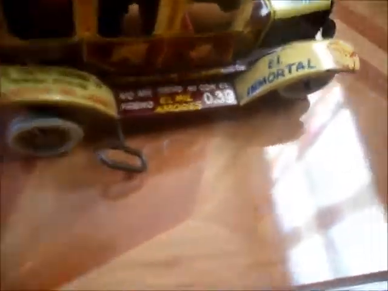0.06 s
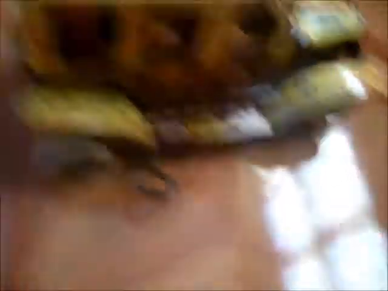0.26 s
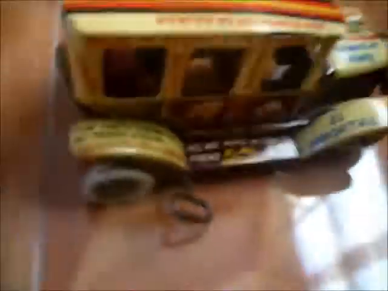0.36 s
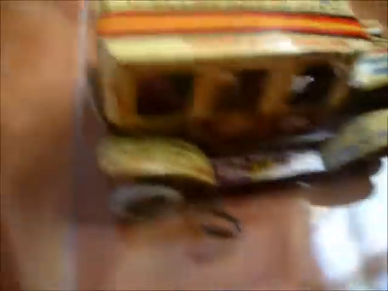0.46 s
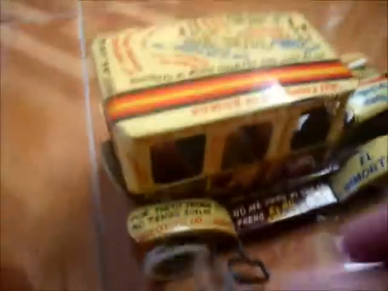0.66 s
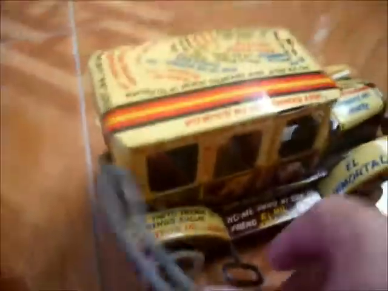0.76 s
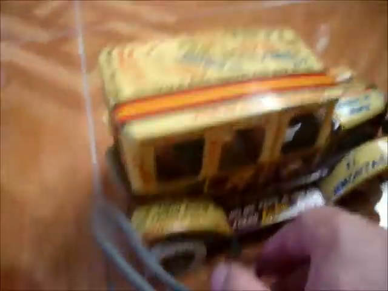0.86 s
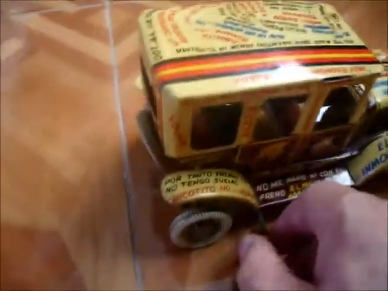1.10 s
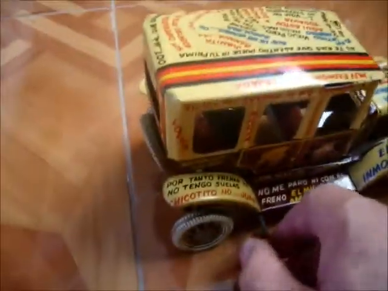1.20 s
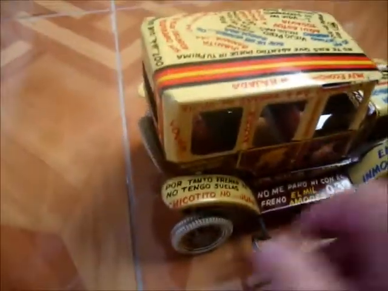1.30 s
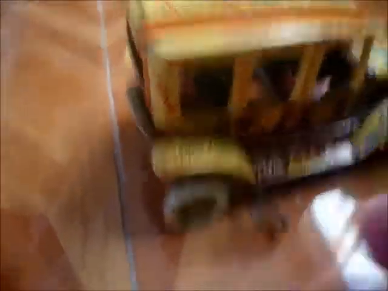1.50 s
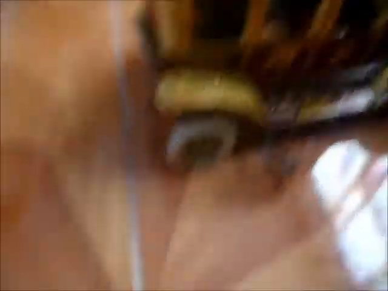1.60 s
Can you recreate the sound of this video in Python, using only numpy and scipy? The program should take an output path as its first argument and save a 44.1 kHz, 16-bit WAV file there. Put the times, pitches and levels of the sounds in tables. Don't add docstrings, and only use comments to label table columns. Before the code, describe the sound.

A tin wind-up toy car, close up in a quiet room. Damped knocks and a loud crack come at 0.2 s, another knock at 0.36, a quick loose chatter at 0.4, and a soft click at 0.6. From 0.85 to 1.25 it scrapes on tile with ringing key tugs, then jolts at 1.26, bouncing and rattling away with a thin spring buzz. Faint, grainy room noise; dull narrow-band microphone.

```python
import sys
import numpy as np
from scipy import signal
from scipy.io import wavfile
from scipy.ndimage import uniform_filter1d

SR = 44100
rng = np.random.default_rng(int(sys.argv[2]) if len(sys.argv) > 2 else 0)


def undo_db(level):
    steps = np.asarray(level, float) / 20
    return 10 ** steps


def unload_audio(sound):
    columns = np.transpose(np.atleast_2d(sound))
    steps = np.round(np.clip(columns, -1, 1) * 32767)
    wavfile.write(sys.argv[1], SR, steps.astype(np.int16))


N = 72765
RISE_S = 0.0003
PATCHY_DB = 1.5

# pitch_hz, level_db, t60_s
EDGE = [(2484, 1.5, 0.0061), (2510, -8.5, 0.0067), (3480, -15, 0.019), (1430, -14.5, 0.015)]


def unit(x):
    return x / np.sqrt(np.mean(x ** 2) + 1e-20)


def ring(modes, rise_s):
    t = np.arange(SR // 2) / SR
    decaying = sum(undo_db(db - 60 * t / t60) * np.sin(2 * np.pi * hz * t) for hz, db, t60 in modes)
    return decaying * (1 - np.exp(-t / rise_s))


def strikes(times, sizes):
    places = np.round(np.asarray(times) * SR).astype(int)
    return np.bincount(places, sizes, N)[:N]


def sound(force, body):
    return signal.fftconvolve(force, body)[:N]


def dull(x, hz):
    return signal.lfilter(*signal.butter(2, hz, fs=SR), x)


def grains(rate, spread_db):
    where, size, sign = rng.random((3, N))
    heights = undo_db(-abs(spread_db) * np.log(size + 1e-9))
    return unit((where < rate / SR) * heights * np.sign(sign - .5))


def noise(spectrum, patchy_db):
    hz, _, z = signal.stft(rng.standard_normal(N), SR, nperseg=1024)
    field = uniform_filter1d(rng.standard_normal(z.shape), size=4, axis=0)
    field = uniform_filter1d(field, size=5, axis=1)
    f, db = np.transpose(spectrum)
    colour = np.interp(np.log(hz + 1), np.log(f), db)[:, None]
    coloured = z * undo_db(colour + patchy_db * unit(field))
    return unit(signal.istft(coloured, nperseg=1024)[1][:N])


def shared_blows(blows, bodies):
    s, swing, *parts = np.transpose(blows)
    return sum(sound(strikes(s, np.sign(swing) * undo_db(db)), body) for db, body in zip(parts, bodies))


def hand_knocks():
    # start_s, first_swing (+/-), shell_db, edge_db, base_db
    blows = [
        (.2101, 1, -20, -20, -30),
        (.21065, -1, -5, -24, -11),
        (.3633, -1, -5, -22, -24),
        (.596, 1, -36, -45, -33),
        (.6052, -1, -26, -36, -42),
    ]
    # pitch_hz, level_db, t60_s
    shell = [(1103, 5.5, 0.0041), (1039, -8, 0.02)]
    base = [(663, -8.5, 0.03), (896, 6.5, 0.005)]
    return shared_blows(blows, (ring(shell, 0.00058), ring(EDGE, RISE_S), ring(base, RISE_S)))


def loudest_crack():
    start_s, lag_s, rise_s, size = .21731, .0001, .00012, undo_db(0.86)
    # pitch_hz, level_db, t60_s
    plate = [(2230, 4, .003), (2230, -16.5, .016),
             (2500, -23, .018), (3370, -20, .015)]
    recoil = [(1070, -7, .021)]
    crack = sound(strikes([start_s], [size]), ring(plate, rise_s))
    return crack - sound(strikes([start_s + lag_s], [size]), ring(recoil, rise_s))


def axle_shudder():
    # start_s, first_swing (+/-), panel_db, rim_db, belly_db
    blows = [
        (.378, 1, -45.5, -32, -53),
        (.3879, 1, -34, -14.5, -11),
        (.3918, 1, -20.5, -21, -28),
        (.3941, 1, -26, -24, -23.5),
        (.3983, 1, -13.5, -14, -18),
        (.4012, 1, -19, -25, -18.5),
        (.4022, 1, -21.5, -16.5, -16),
        (.4044, 1, -12.5, -43, -38.5),
    ]
    # pitch_hz, level_db, t60_s
    panel = [(933, 1, 0.014), (1086, -11.5, 0.026)]
    rim = [(2740, -0.5, 0.0099), (1921, -8.5, 0.023), (3150, -5.5, 0.0052)]
    belly = [(548, -5.5, 0.044), (826, -5, 0.018)]
    return shared_blows(blows, (ring(panel, RISE_S), ring(rim, RISE_S), ring(belly, RISE_S)))


def free_tin(force):
    # pitch_hz, level_db, t60_s
    tin = [(449.3, -7, 0.11), (701, -5, .09), (860, -10, .08), (969, 0, .14), (970, -3, 0.045),
           (1286, -1, 0.1), (1453, -3.5, 0.071), (1752, -7, .07), (2033, -17, 0.44), (2421, -6.5, .09),
           (2592, -9.5, 0.072), (2966, -10.5, 0.13), (3202, -11, 0.12)]
    clack = [(932, 0, .014), (733, -6, .015), (1405, -4, 0.0037), (1850, -6.5, 0.019), (2450, -8, 0.006),
             (3160, -10.5, 0.0051)]
    return sound(force, ring(tin, RISE_S) + undo_db(6.5) * ring(clack, RISE_S))


def sliding_and_winding():
    t = np.arange(N) / SR
    # time_s, level_db
    slide = [(.84, -70.5), (.9, -53), (.95, -46), (1.0, -48.5), (1.08, -45), (1.16, -46.5), (1.22, -52),
             (1.3, -51), (1.42, -63)]
    # start_s, level_db
    key = [(.911, -35), (0.934, -24), (0.949, -29), (0.989, -31), (1.037, -25.5), (1.044, -30.5),
           (1.078, -25.5), (1.084, -31.5), (1.123, -28.5), (1.2381, -21.5), (1.245, -31)]
    # pitch_hz, density_db (per Hz)
    drag = [(120, -48), (200, -7.5), (420, -1), (700, -14), (1500, -30.5)]
    pressure = undo_db(np.interp(t, *np.transpose(slide), left=-120, right=-120))
    s, db = np.transpose(key)
    tugs = sound(strikes(s, undo_db(db)), undo_db(-60 * t[:SR // 5] / .05))
    friction = undo_db(-28) * pressure + undo_db(-35.5) * tugs
    force = friction * grains(2600, spread_db=2.5) + strikes(s, undo_db(db - 12.5))
    return free_tin(dull(force, 1850)) + undo_db(2) * pressure * noise(drag, PATCHY_DB)


def key_tick():
    return sound(strikes([1.2122], [undo_db(-30)]), ring([(3205, 0, 0.0079)], RISE_S))


def jolt_and_rattle():
    t = np.arange(N) / SR
    jolt_s, jolt_db = 1.2616, -15
    hold_s, rattle_t60_s = 0.0096, 0.35
    spring_lag_s, spring_t60_s = 0.018, 0.42
    # start_s, level_db
    bounces = [
        (1.2628, -21),
        (1.2658, -28.5),
        (1.2754, -18.5),
        (1.28, -23),
        (1.286, -23.5),
        (1.297, -31),
        (1.303, -31),
        (1.308, -24),
    ]
    # pitch_hz, level_db, t60_s
    jingle = [(1608, -0.5, .015), (2090, 1, 0.017), (2450, -0.5, .025), (2783, -3.5, .02), (3274, -9, .015)]
    spring = [(1997, 0, .22), (2035, -7, .1), (1955, -8, .1)]
    after = np.maximum(t - jolt_s - hold_s, 0)
    shake = (t > jolt_s) * undo_db(-61 - 60 * after / rattle_t60_s) * grains(2100, spread_db=2.5)
    s, db = np.transpose(bounces)
    shake = shake + strikes(s, undo_db(db - 17)) + strikes([jolt_s], [undo_db(jolt_db - 20)])
    tin = free_tin(dull(shake, 3775))
    tabs = undo_db(8) * sound(shake, ring(jingle, RISE_S))
    snap = sound(strikes([jolt_s], [-undo_db(jolt_db)]), ring(EDGE, RISE_S))
    late = t - jolt_s - spring_lag_s
    buzz = (late > 0) * undo_db(-63 - 60 * np.abs(late) / spring_t60_s) * grains(600, spread_db=1.5)
    return tin + tabs + snap + sound(buzz, ring(spring, RISE_S))


def hand_thumps():
    # start_s, level_db
    pushes = [
        (0.17, -36),
        (.216, -32.5),
        (0.292, -38),
    ]
    # pitch_hz, level_db, t60_s
    low_modes = [(91.3, -1.5, 0.11), (140.3, 1.5, .05), (197.2, -4, 0.063)]
    s, db = np.transpose(pushes)
    return sound(strikes(s, undo_db(db)), ring(low_modes, 0.004))


def tile_boom():
    # pitch_hz, level_db, t60_s
    tile = [(134.8, -36, 0.53)]
    return sound(strikes([1.18], [1.]), ring(tile, 0.025))


def echo(x):
    t = np.arange(SR // 5) / SR
    tail = rng.standard_normal(len(t)) * undo_db(-60 * t / 0.042) * (t > .003)
    return undo_db(-19.5) * sound(x, tail / np.linalg.norm(tail))


def room_air():
    t = np.arange(N) / SR
    # pitch_hz, density_db (per Hz)
    colour = [(20, -21), (60, -23.5), (110, -15), (210, -1), (320, -6), (800, -11), (1500, -17),
              (3800, -32)]
    # time_s, level_db
    swell = [(0, -1.5), (.2, -0.5), (.3, -0.5), (.55, 0), (.8, 0), (1.45, 0.5), (1.65, 1)]
    return undo_db(-43 + np.interp(t, *np.transpose(swell))) * noise(colour, PATCHY_DB)


def far_machinery():
    t = np.arange(N) / SR
    # pitch_hz, density_db (per Hz)
    colour = [(300, -41.5), (400, -6), (480, 0.5), (550, -7), (700, -38.5)]
    # time_s, level_db
    swell = [(0, -49.5), (.2, -44.5), (.3, -56.5), (.55, -56), (.65, -47), (.85, -53.5), (1.2, -52),
             (1.45, -58), (1.65, -52)]
    return undo_db(np.interp(t, *np.transpose(swell))) * noise(colour, patchy_db=3)


def scene():
    held = hand_knocks() + loudest_crack() + axle_shudder()
    on_floor = sliding_and_winding() + key_tick() + jolt_and_rattle()
    toy = signal.lfilter(*signal.butter(1, 120, "high", fs=SR), held + on_floor)
    return (toy + echo(toy) + hand_thumps() + tile_boom() + room_air() + far_machinery())[None]


def band_limit(x):
    return signal.sosfilt(signal.butter(12, 16100, fs=SR, output="sos"), x)


def record(dry):
    rate_hz, step, offset = 8000, 1 / 128, -.0062
    lag = 3
    up, down = SR // 100, rate_hz // 100
    held = signal.resample_poly(np.roll(dry[0], -lag), down, up) + offset
    coarse = np.clip(np.round(held / step), -128, 127) * step
    smooth = signal.firwin(64 * up + 1, 3870, window=("kaiser", 9), fs=rate_hz * up)
    full = signal.resample_poly(coarse, up, down, window=smooth, padtype="mean")
    full = np.pad(full, (lag, 0), "reflect")[:N]
    return band_limit(np.clip(full[None], -1, 1))


dry = scene()
out = record(dry)
unload_audio(out)
```